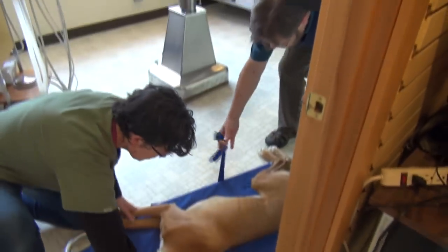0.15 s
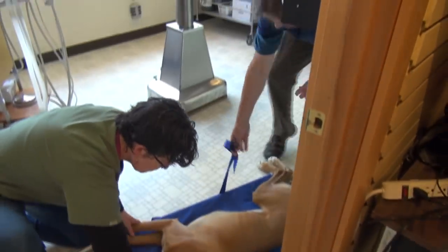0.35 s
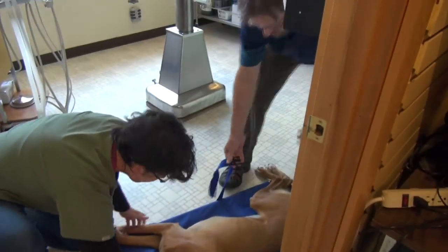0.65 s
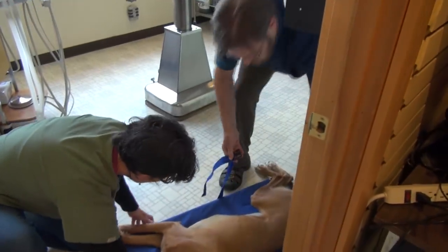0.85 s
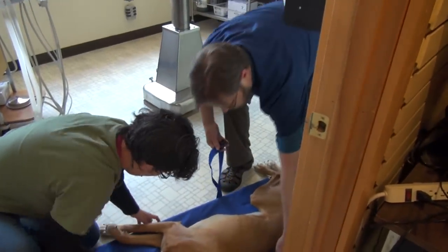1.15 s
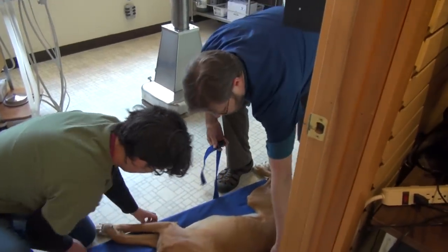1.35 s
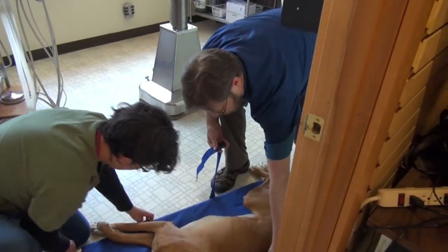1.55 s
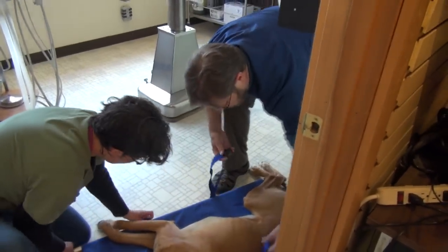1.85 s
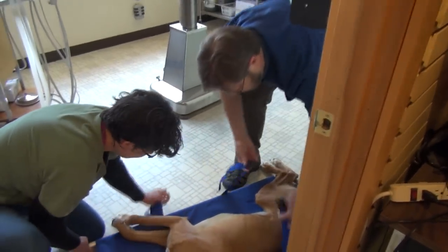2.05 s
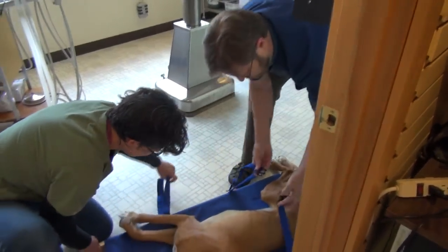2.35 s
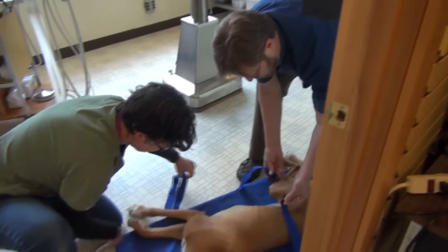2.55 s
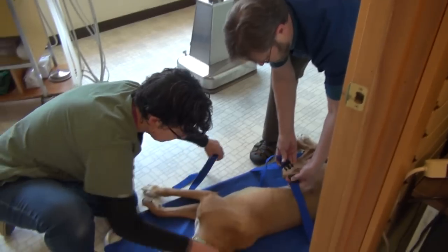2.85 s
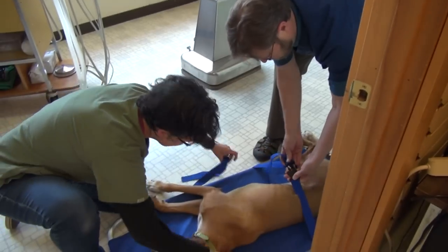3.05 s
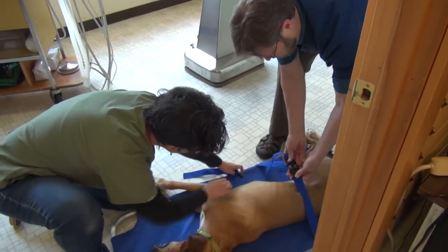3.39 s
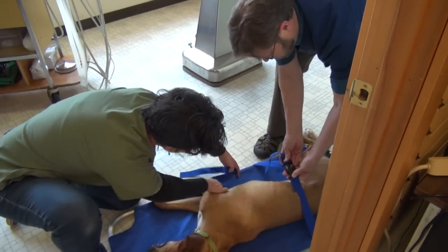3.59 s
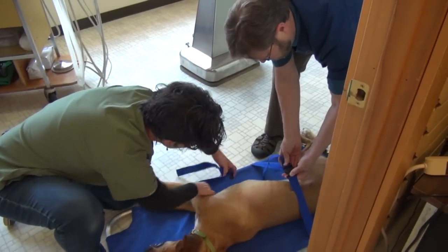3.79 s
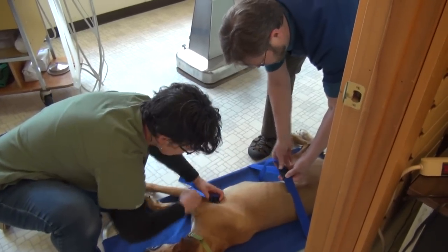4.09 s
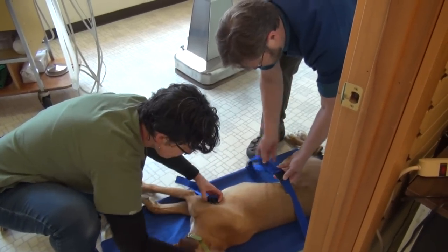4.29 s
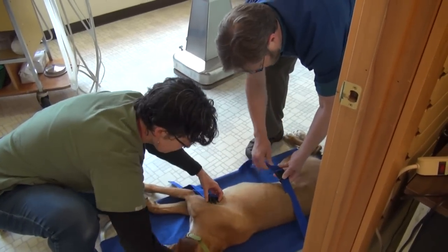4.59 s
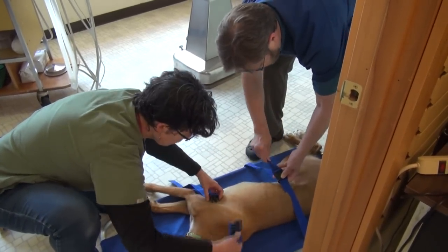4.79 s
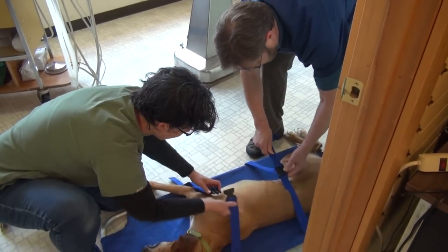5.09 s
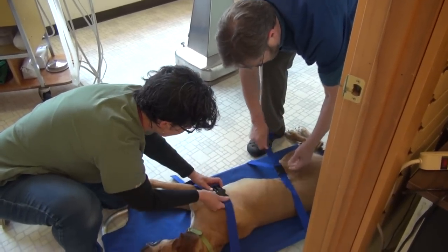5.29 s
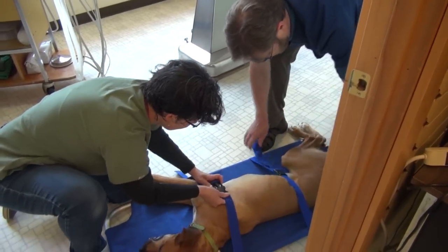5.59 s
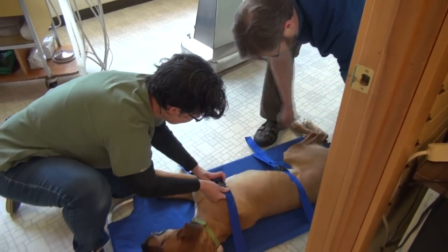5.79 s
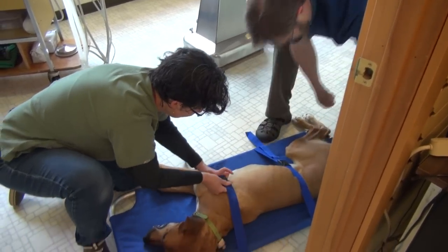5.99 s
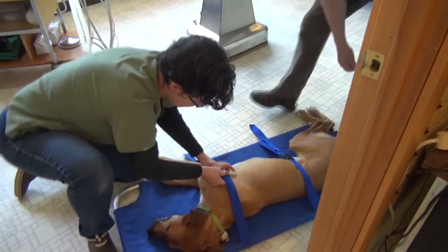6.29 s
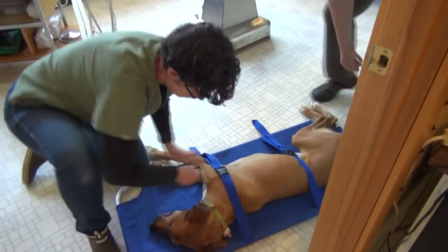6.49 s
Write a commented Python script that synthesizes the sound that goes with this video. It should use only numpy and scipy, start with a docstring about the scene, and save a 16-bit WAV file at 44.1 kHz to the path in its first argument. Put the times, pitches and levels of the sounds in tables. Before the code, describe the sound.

Close stereo pickup of a stretcher being strapped on an indoor floor. It opens with a bump and gritty cloth rustle, then webbing rubs, squeaks faintly and loose buckle halves tick. A pole knocks the floor early on. Fabric noise thins before one hard double-edged plastic click, then light fumbling and a tiny bright ping, a second sharp click, and a last tug and soft thump over quiet room air.

```python
"""A small, hard-walled room: two people strap a dog onto a cloth stretcher on the floor.
Two plastic buckles snap shut and loose halves tap: struck bodies ring. Shoes, knees and a pole hit the floor.
Nylon webbing rustles, squeaks and pings and cloth flaps: shaped noise and grains, over the room's steady hush.
The camera's limiter ducks each snap, so the room's echo swells up just behind it."""
import sys
import numpy as np
from scipy import signal
from scipy.fft import rfft, irfft, next_fast_len
from scipy.io import wavfile
from scipy.ndimage import uniform_filter1d, minimum_filter1d, map_coordinates

SR = 44100
rng = np.random.default_rng(int(sys.argv[2]) if len(sys.argv) > 2 else 0)


def dump(signal):
    """Clip the signal to [-1, 1] and save it as 16-bit WAV at the path in sys.argv[1]."""
    limited = np.clip(np.atleast_2d(signal).T, -1, 1)
    pcm = np.round(limited * 32767).astype(np.int16)
    wavfile.write(sys.argv[1], SR, pcm)


N = 292867

# how straps, buckles and cloth lean in the stereo image: (frequency [Hz], left minus right [dB])
STRAP_SIDE = [(100, -12), (300, -17), (700, -10.5), (1300, -4.5), (4000, -2.5), (8000, -1), (11000, 3.5),
              (13000, -10.5)]
# likeness of the two channels, in echo and friction: (frequency [Hz], correlation [0-1])
CHANNEL_LIKENESS = [(60, 1), (200, 0.82), (640, 0.87), (1400, 0.72), (3500, 0.73), (7000, 0.83),
                    (15000, 0.5)]
# gritty scrape of a sole or pole on the floor: (frequency [Hz], relative level [dB])
SCUFF_SPECTRUM = [(100, -66), (1000, 9), (2600, 11), (3800, 12.5), (7000, 6.5), (11000, -1), (13000, -17),
                  (16000, -39)]


def amp(db):
    """Decibels to an amplitude factor."""
    return 10 ** (np.asarray(db) / 20)


def unit(x):
    """The sound scaled to rms 1."""
    return x / np.sqrt(np.mean(x ** 2) + 1e-20)


def along(points, hz):
    """Read (frequency, value) points on a log frequency axis."""
    f, v = np.transpose(points)
    return np.interp(np.log(hz + 1), np.log(f + 1), v)


def add(track, s, sound):
    """Mix a sound into the track at time s."""
    start = max(round(s * SR), 0)
    part = sound[..., :max(track.shape[-1] - start, 0)]
    track[..., start:start + part.shape[-1]] += part


def filtered(x, response):
    """Multiply the spectrum of x by a response of frequency."""
    n = x.shape[-1]
    m = next_fast_len(n + SR // 8)  # padding keeps the end from wrapping onto the start
    spectrum = rfft(x, m) * response(np.fft.rfftfreq(m, 1 / SR))
    return irfft(spectrum, m)[..., :n]


def causal(gain):
    """The response with this gain that rings only after it is struck (minimum phase)."""
    cepstrum = irfft(np.log(np.maximum(gain, 1e-6)))
    half = len(cepstrum) // 2
    cepstrum[1:half] *= 2
    cepstrum[half + 1:] = 0
    return np.exp(rfft(cepstrum))


def shape(points):
    """Gain curve of a (frequency [Hz], level [dB]) spectrum."""
    return lambda hz: amp(along(points, hz))


def band(centre_hz, octaves):
    """Gain curve of a smooth band with steep skirts, above a floor at -72 dB."""
    return lambda hz: np.exp(-.5 * (np.log2((hz + 1) / centre_hz) / octaves) ** 2) + amp(-72)


def resonances(modes, hz):
    """Summed power, as a gain, of (frequency [Hz], width [Hz], level [dB]) resonances."""
    power = 0
    for centre, width, db in modes:
        mode = amp(db) * hz * width / (centre * centre - hz * hz + 1j * hz * width)
        power = power + np.abs(mode) ** 2
    return np.sqrt(power)


def placed(x, side):
    """Lean a sound to the left or right, band by band."""
    return filtered(x * np.ones((2, 1)), lambda hz: unit_pair(along(side, hz)))


def unit_pair(lean_db):
    """Left and right gains with a mean of one."""
    pair = amp(np.array([lean_db, -lean_db]) / 2)
    return pair / pair.mean(axis=0)


def stereo(pair, likeness):
    """Blend two unrelated signals as mid and side to a given left-right correlation."""
    def mid_side_gains(hz):
        angle = np.arccos(np.clip(along(likeness, hz), -1, 1)) / 2
        return np.array([np.cos(angle), np.sin(angle)])

    mid, side = filtered(pair, mid_side_gains)
    return np.array([mid + side, mid - side])


def blow(gain, contact, push=0.55, attack=0.00061, size=4096):
    """A push and a dying chatter of micro-contacts through a body; the loudest 3 ms have rms 1."""
    t = np.arange(size) / SR
    decay = amp(-60 * t / max(contact, .002))  # contact [s] is the time to fall 60 dB
    force = rng.standard_normal(size) * decay * (1 - np.exp(-t / attack))
    force[round(attack * SR)] += 4 * push
    body = causal(gain(np.fft.rfftfreq(2 * size, 1 / SR)))
    x = irfft(rfft(force, 2 * size) * body)[:size]
    loudest_power = uniform_filter1d(x ** 2, 3 * SR // 1000, mode="constant").max()
    return x / np.sqrt(loudest_power)


def in_room(x, wet_db, build=0.0031):
    """The direct sound and a fresh diffuse tail that builds up and dies band by band."""
    # how long the room rings: (frequency [Hz], time to fall 60 dB [s])
    ring_times = [(150, 0.33), (1000, 0.3), (2200, 0.36), (4000, 0.39), (8000, 0.41), (12000, 0.3),
                  (15000, 0.11)]
    hz, t, z = signal.stft(rng.standard_normal((2, SR * 2 // 3)), SR, nperseg=256)
    decay = amp(-60 * t / along(ring_times, hz)[:, None])
    tail = signal.istft(z * decay, SR, nperseg=256)[1]
    t = np.arange(tail.shape[1]) / SR
    tail = stereo(tail, CHANNEL_LIKENESS) * (1 - np.exp(-(t / build) ** 2))
    tail *= amp(wet_db) / np.linalg.norm(tail[0])
    tail[:, 0] += 1  # the direct sound
    return signal.fftconvolve(x[None], tail, axes=1)


def snaps(ring_db=-1, wet_db=-2.0):
    """Two sprung prongs jump into their slots one after the other and ring the hollow shell."""
    # buckles latching: (time [s], level [dB], delay of second prong [s], second prong re first [dB])
    latchings = [(3.9952, -3, .0035, -1), (6.0637, -2.5, .0042, -4.5)]
    # ringing shells of the two buckles: (frequency [Hz], width [Hz], relative level [dB])
    rear_shell = [(1470, 65, -5), (2230, 90, 0), (3040, 130, -1), (3670, 150, 12.5), (4160, 200, 10),
                  (4870, 200, -4), (5740, 300, 1.5), (7660, 540, -16), (8780, 560, -3)]
    front_shell = [(1370, 130, -5.5), (1870, 170, -6), (2950, 160, -1.5), (4000, 170, 3.5),
                   (4200, 160, -11), (4940, 220, -4), (5500, 340, -3), (6870, 500, -16), (8100, 570, -14),
                   (11300, 1000, -23)]
    # sharp crack of the latch: (frequency [Hz], relative level [dB])
    latch_crack = [(60, -80), (280, -83), (650, -23), (1050, -42.5), (1400, -20), (2100, -10), (2800, -15),
                   (4000, 1), (4900, -14), (7000, -4), (8700, -16.5), (10200, -20), (12000, -10.5),
                   (16000, -47)]
    out = np.zeros((2, N))
    for (s, db, lag, second_db), shell in zip(latchings, [rear_shell, front_shell]):
        body = lambda hz: np.hypot(shape(latch_crack)(hz), amp(ring_db) * resonances(shell, hz))
        for delay, prong_db in [(0, 0), (lag, second_db)]:
            click = blow(body, contact=0.025, push=1.52)
            add(out, s + delay, amp(db + prong_db) * in_room(click, wet_db, build=0.0089))
    return placed(out, STRAP_SIDE)


def taps():
    """Loose buckle halves knock lightly together: clicks with the room around them."""
    # (time [s], relative level [dB], ring [Hz], knock [Hz], knock relative level [dB])
    tap_rows = [(0.0504, -16.5, 3900, 1370, -8.5), (0.279, -26.5, 2600, 1440, -11),
                (0.3278, -30.5, 3300, 1220, -1), (0.425, -29, 2900, 1900, -8.5),
                (0.646, -24.5, 5330, 1970, -5), (1.1274, -30, 3070, 1210, -20),
                (1.4446, -32, 4070, 1060, -9), (1.513, -29, 3700, 1190, -2.5),
                (2.1268, -25.5, 2870, 2150, -6.5), (3.2995, -20.5, 3900, 1480, -21.5),
                (3.5246, -18.5, 3760, 1690, -30), (3.5498, -28.5, 4340, 1770, -16),
                (3.596, -38.5, 4040, 1590, 2), (3.6234, -29.5, 4080, 1600, -11),
                (3.7153, -24, 4200, 2360, -22), (3.807, -27.5, 4100, 2320, -27),
                (4.4364, -25, 2830, 1760, -7.5), (4.5162, -32.5, 4200, 1340, 3),
                (4.5773, -38, 4590, 1120, 1.5), (4.626, -24, 4130, 1780, -19.5),
                (4.6905, -34.5, 2630, 2320, -10), (4.8628, -35.5, 4950, 1585, -11),
                (5.221, -32.5, 3430, 1930, -15), (5.6648, -29.5, 3700, 1910, -27),
                (5.7761, -31.5, 4200, 1880, -29), (5.7982, -32.5, 2970, 2320, -15)]
    out = clicks(list(tap_rows) + stray_taps(), width_hz=870, knock_width_hz=1170, knock_gain_db=10.5,
                 crack_db=-7.0, contact=0.023, wet_db=-4.5)
    return amp(-12.5) * placed(out, STRAP_SIDE)


def ticks():
    """Small clicks so close to the camera that they stay almost dry, with broad, short rings."""
    # (time [s], relative level [dB], ring [Hz], knock [Hz], knock relative level [dB])
    tick_rows = [(1.918, -12, 6940, 1420, -14), (1.938, -17.5, 4300, 1500, -9.5),
                 (2.2014, -14.5, 2690, 1750, -28), (2.2695, -14, 6100, 1570, -12),
                 (3.0999, -24.5, 2550, 1650, -4.5)]
    # lean of these close sounds: (frequency [Hz], left minus right [dB])
    near_side = [(300, -2), (1400, 8), (4000, 5), (12000, -2)]
    out = clicks(tick_rows, width_hz=3700, knock_width_hz=1230, knock_gain_db=12.5,
                 crack_db=-10.5, contact=0.018, wet_db=-19.0)
    return amp(-11) * placed(out, near_side)


def stray_taps(count=8, level_db=-41, spread_db=3.0, follow=0.7, ring_hz=3900, knock_hz=1600, knock_db=-12):
    """Rows of faint chance taps as the straps swing, stronger when the hands are busy."""
    times = (np.arange(count) + rng.random(count)) * N / SR / count
    rows = []
    for s, (a, b, c) in zip(times, rng.standard_normal((count, 3))):
        db = level_db + follow * effort_db(s) + spread_db * a
        rows.append((s, db, ring_hz * np.exp(.2 * b), knock_hz * np.exp(0.25 * b), knock_db + 3 * c))
    return rows


def clicks(rows, width_hz, knock_width_hz, knock_gain_db, crack_db, contact, wet_db, dull_hz=8000, crack_s=0.014):
    """Light plastic contacts: one short ring, a hollow knock and a bright crack."""
    # crack of hard plastic: (frequency [Hz], relative level [dB])
    plastic_crack = [(1500, -25), (5000, -3.5), (8000, 1.5), (11000, -8.5), (13500, -18), (16000, -53)]
    out = np.zeros((2, N))
    for s, db, ring_hz, knock_hz, knock_rel_db in rows:
        ring_body = lambda hz: resonances([(ring_hz, width_hz, 0)], hz) / (1 + (hz / dull_hz) ** 4)
        knock_body = lambda hz: resonances([(knock_hz, knock_width_hz, 0)], hz) ** 2
        ring = blow(ring_body, contact)
        knock = amp(knock_rel_db + knock_gain_db) * blow(knock_body, contact)
        crack = amp(crack_db) * blow(shape(plastic_crack), crack_s)
        add(out, s, amp(db) * in_room(ring + knock + crack, wet_db))
    return out


def bumps(boom_gain_db=-1, thud_gain_db=-1, scuff_db=-10, slap_wet_db=-3, thud_wet_db=1.5,
          slap_octaves=0.73, settle=0.00376):
    """A sole or a pole slaps and scuffs the floor; the weight settles just after with a boom and a thud."""
    # shoes, knees and stretcher meeting the floor: (time [s], slap level [dB], slap centre [Hz],
    # boom relative level [dB], thud relative level [dB], slap and scuff contact [s])
    landings = [(0.002, -21.5, 1270, -30.5, -38, 0.058), (0.406, -31.5, 1090, -42, -50, 0.041),
                (0.6166, -23, 674, -34.5, -40.5, 0.018), (1.2897, -17, 1065, -31.5, -49, 0.024),
                (1.602, -28.5, 1170, -29, -38.5, 0.071), (2.577, -37.5, 1040, -33.5, -31.5, 0.066),
                (6.5349, -25.5, 866, -24, -30.5, 0.025)]
    # booming and thudding of the floor: (frequency [Hz], relative level [dB])
    boom_spectrum = [(60, -32), (150, -14), (220, -2), (330, 7), (440, -7), (700, -12.5), (2000, -88)]
    thud_spectrum = [(25, -42), (65, -30), (105, -4.5), (170, 0), (240, -1), (450, -22), (1500, -45)]
    # lean of the floor sounds: (frequency [Hz], left minus right [dB])
    floor_side = [(60, -18), (300, -18), (700, -11), (1300, -5), (2500, -3.5), (9000, 0)]
    out = np.zeros((2, N))
    for s, slap_db, slap_hz, boom_db, thud_db, contact in landings:
        slap = amp(slap_db) * blow(band(slap_hz, slap_octaves), contact, push=2.85)
        scuff = amp(slap_db + scuff_db) * blow(shape(SCUFF_SPECTRUM), contact)
        boom = amp(boom_gain_db + boom_db) * blow(shape(boom_spectrum), contact=0.035, push=4.6)
        thud = amp(thud_gain_db + thud_db) * blow(shape(thud_spectrum), contact=0.035, push=1.8)
        add(out, s, in_room(slap + scuff, slap_wet_db))
        add(out, s + settle, in_room(boom, thud_wet_db) + in_room(thud, thud_wet_db))
    return placed(out, floor_side)


def pole(scuff_db=-2, wet_db=-5):
    """The stretcher's pole lands and bounces: it scuffs the floor and rings briefly at each contact."""
    # (time [s], level [dB])
    knocks = [(1.2891, -25.5), (1.3224, -29.5)]
    # what the pole rings with: (frequency [Hz], width [Hz], relative level [dB])
    pole_modes = [(1053, 14, -4), (1286, 43, -3.5), (1970, 54, -10), (2860, 33, -5), (3623, 29, 2)]
    out = np.zeros((2, N))
    for s, db in knocks:
        ring = blow(lambda hz: resonances(pole_modes, hz), contact=0.006, push=1.3)
        scuff = amp(scuff_db) * blow(shape(SCUFF_SPECTRUM), contact=0.016)
        add(out, s, amp(db) * in_room(ring + scuff, wet_db))
    return placed(out, STRAP_SIDE)


def webbing():
    """Webbing rushes over cloth and floor; narrow bands make squeaks and brief pings of tapped buckles."""
    # broad pulls, then narrow squeaks and pings:
    # (time at its height [s], level [dB], centre [Hz], half-length [s])
    pulls = [(0.036, -33.5, 1370, 0.021), (0.096, -37.5, 1360, 0.015), (0.45, -43, 1700, 0.012),
             (0.755, -44.5, 3950, 0.012), (1.199, -34, 1550, 0.0045), (1.604, -37.5, 4860, 0.0099),
             (1.72, -43.5, 1500, 0.017), (1.809, -50, 1260, 0.011), (2.073, -33.5, 1860, 0.015),
             (2.112, -33.5, 2600, 0.01), (2.227, -37, 3600, 0.015), (2.57, -42.5, 1800, 0.012),
             (3.234, -45, 3300, 0.015), (3.615, -50, 1410, 0.014), (4.536, -47, 1160, 0.018),
             (5.376, -35.5, 5000, 0.022), (5.385, -40, 1490, 0.024), (5.49, -47, 1570, 0.018),
             (5.88, -53.5, 1510, 0.024), (6.479, -46, 3920, 0.0055), (6.564, -30.5, 4070, 0.012)]
    squeaks_and_pings = [(0.521, -45, 6000, 0.058), (1.505, -39, 3820, 0.008), (1.965, -41, 660, 0.032),
                         (3.719, -39, 6660, 0.0023), (4.519, -32.5, 4380, 0.0021),
                         (5.3993, -17, 4020, 0.002), (5.46, -43.5, 3800, 0.061),
                         (5.668, -39.5, 4400, 0.0036)]
    broad = swishes(pulls, octaves=0.78, narrowing=0.36, wet_db=-3)
    narrow = swishes(squeaks_and_pings, octaves=0.092, narrowing=0.65, wet_db=-7.5)
    return broad + narrow


def cloth_flaps():
    """The stretcher's cloth flaps as it is tugged: low swells of band noise."""
    # (time at its height [s], level [dB], centre [Hz], half-length [s])
    tugs = [(0.52, -55, 168, 0.012), (0.76, -49.5, 318, 0.02), (1.38, -51, 343, 0.035),
            (1.525, -47, 317, 0.017), (2.11, -51, 303, 0.019), (4.56, -57.5, 294, 0.045),
            (5.38, -48.5, 295, 0.025), (6.262, -51.5, 186, 0.017)]
    return swishes(tugs, octaves=0.39, narrowing=0, wet_db=-3)


def swishes(rows, octaves, narrowing, wet_db, grit_db=1.5, reference_hz=4130):
    """Gritty band noise swells and dies; with narrowing, higher swishes are narrower in octaves."""
    out = np.zeros((2, N))
    for s, db, centre_hz, half in rows:
        t = np.arange(-3 * half, 3 * half, 1 / SR)
        grit = rng.standard_normal(SR // 2 + len(t))
        grit *= amp(grit_db * unit(uniform_filter1d(rng.standard_normal(len(grit)), size=60)))
        # a swish centred on reference_hz has a width of exactly octaves
        width = octaves * (reference_hz / centre_hz) ** narrowing
        rush = unit(filtered(grit, band(centre_hz, width)))[:len(t)]
        add(out, s + t[0], amp(db) * in_room(rush * swell(t, half), wet_db))
    return placed(out, STRAP_SIDE)


def swell(t, half):
    """A smooth rise and fall around t = 0."""
    return np.exp(-.5 * (t / half) ** 2)


def rustle(flap_db=-62, rub_db=-51, hiss_db=-50.5, flap_grows=0.83, rub_grows=1.36, hiss_grows=1.16,
           jerk_db=1.45, jerks_per_s=30):
    """Cloth flaps, webbing rubs the stretcher and its weave hisses; all grow with the hands' jerky effort."""
    # low flapping, mid rubbing and bright hiss: (frequency [Hz], relative level [dB])
    flap_spectrum = [(40, -65), (110, -16.5), (290, 2.5), (450, -3.5), (700, 4), (1500, -81)]
    rub_spectrum = [(250, -18.5), (650, -7), (1250, -1), (2200, -4.5), (3300, -11.5), (7000, -31)]
    hiss_spectrum = [(1500, -23), (3000, 0), (4200, 3.5), (6500, 3), (9000, -3), (12000, -7), (16000, -38)]
    # random changes of pace, smoothly joined
    paces = rng.standard_normal(N * jerks_per_s // SR + 4)
    jerks = map_coordinates(paces, [np.arange(N) * jerks_per_s / SR])
    effort = effort_db(np.arange(N) / SR) + jerk_db * jerks
    flap = friction(flap_spectrum, slips_per_s=160, spread_db=3.5, smooth=0.42)
    rub = friction(rub_spectrum, slips_per_s=450, spread_db=3.4, smooth=1.1)
    hiss = friction(hiss_spectrum, slips_per_s=900, spread_db=-1.5, smooth=1.6)
    flap *= amp(flap_db + flap_grows * effort)
    rub *= amp(rub_db + rub_grows * effort)
    hiss *= amp(hiss_db + hiss_grows * effort)
    return placed(flap + rub + hiss, STRAP_SIDE)


def effort_db(t):
    """Effort of the hands on cloth and webbing, above or below the usual -46.5 dB."""
    # (time [s], effort [dB])
    effort_points = [(0.0, -31.5), (0.13, -47), (0.35, -44.5), (0.52, -43), (0.63, -41), (0.74, -42),
                     (0.81, -51.5), (1.03, -48), (1.39, -47), (1.76, -42), (2.12, -40.5), (2.25, -48.5),
                     (2.96, -55), (3.57, -61.5), (3.7, -52.5), (3.83, -54.5), (4.03, -56.5), (4.16, -62),
                     (4.29, -53.5), (4.66, -48), (4.84, -53), (5.05, -56.5), (5.29, -52), (5.49, -50),
                     (5.92, -53), (6.12, -58.5), (6.23, -50.5), (6.64, -45)]
    return np.interp(t, *np.transpose(effort_points)) + 46.5


def friction(spectrum, slips_per_s, spread_db, smooth, clump_db=2):
    """Fibres catch and slip in clumps: tiny grains of uneven size on a smooth rush, rms 1."""
    sizes = amp(spread_db * np.minimum(rng.exponential(size=N), 3))
    slips = (rng.random(N) < slips_per_s / SR) * sizes
    grains = unit(slips * rng.choice([-1, 1], (2, N)))
    clumps = amp(clump_db * unit(uniform_filter1d(rng.standard_normal(N), size=300)))
    rough = clumps * (grains + smooth * rng.standard_normal((2, N)))
    return unit(filtered(stereo(rough, CHANNEL_LIKENESS), shape(spectrum)))


def air(level_db=-55.5):
    """The steady hush of the room: shaped noise, loosely alike in the two channels."""
    # (frequency [Hz], relative level [dB])
    hush_spectrum = [(15, -55), (25, -50), (120, -8), (354, -10.5), (416, -1.5), (476, -6), (840, -4),
                     (1100, 0.5), (1230, -2), (2110, -7), (2280, -3.5), (2690, -6.5), (4030, -11),
                     (13600, -23.5), (16000, -37)]
    # (frequency [Hz], left-right correlation [0-1])
    hush_likeness = [(60, 0.16), (640, 0.28), (1400, 0.4), (3100, 0.76), (7000, 0.45), (15000, .2)]
    # (frequency [Hz], left minus right [dB])
    hush_side = [(60, 14), (110, -15), (200, -5.5), (380, 4), (700, 11.5), (1290, 3), (2380, 4), (4400, 2),
                 (8120, 6), (15000, -10)]
    hush = filtered(stereo(rng.standard_normal((2, N)), hush_likeness), shape(hush_spectrum))
    return amp(level_db) * placed(unit(hush), hush_side)


def scene():
    """Buckles, floor, webbing and cloth together, over the air of the room."""
    buckles = snaps() + taps() + ticks()
    floor = bumps() + pole()
    fabric = webbing() + cloth_flaps() + rustle()
    return buckles + floor + fabric + air()


def record(dry, threshold_db=-6, squeeze=0.82, release_db_per_s=550, lag=1.8e-5, top_hz=15950):
    """The right microphone port hears lag [s] earlier; a fast limiter cuts most of each peak's excess."""
    ports = np.array([[-1], [1]])
    x = filtered(dry, lambda hz: np.exp(1j * np.pi * hz * lag * ports))
    level_db = 20 * np.log10(np.abs(x).max(axis=0) + 1e-9)
    over_db = np.maximum(level_db - threshold_db, 0)
    # the ducking jumps up at a peak and recovers at a steady rate
    recovery = release_db_per_s * np.arange(N) / SR
    duck_db = np.maximum.accumulate(squeeze * over_db + recovery) - recovery
    gain = uniform_filter1d(minimum_filter1d(amp(-duck_db), size=24), size=24)
    return filtered(x * gain, lambda hz: hz < top_hz)  # nothing passes above top_hz


dry = scene()
out = record(dry)
dump(out)
```